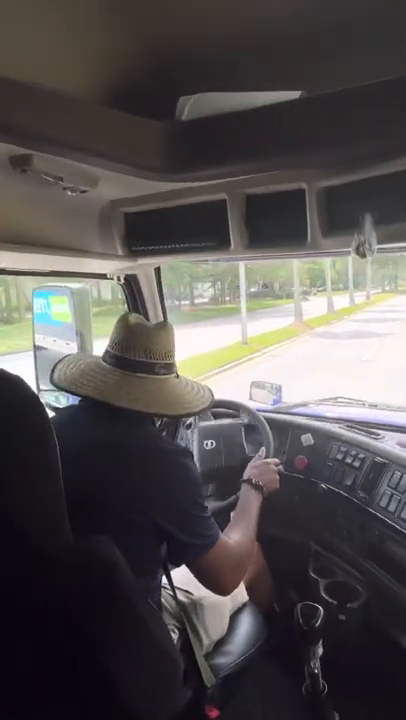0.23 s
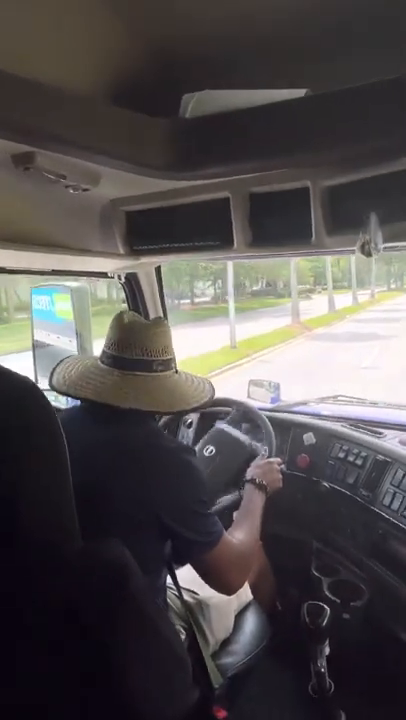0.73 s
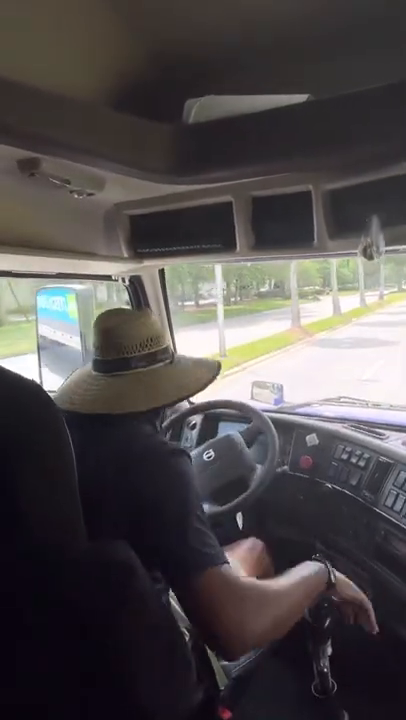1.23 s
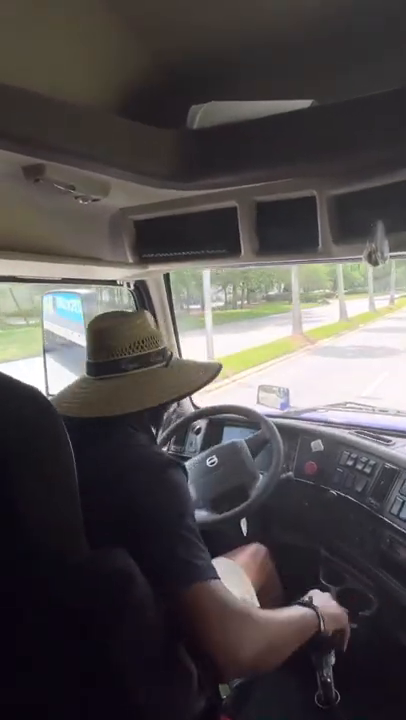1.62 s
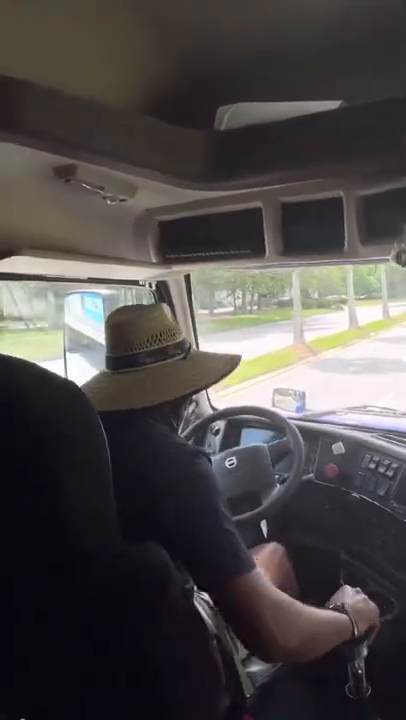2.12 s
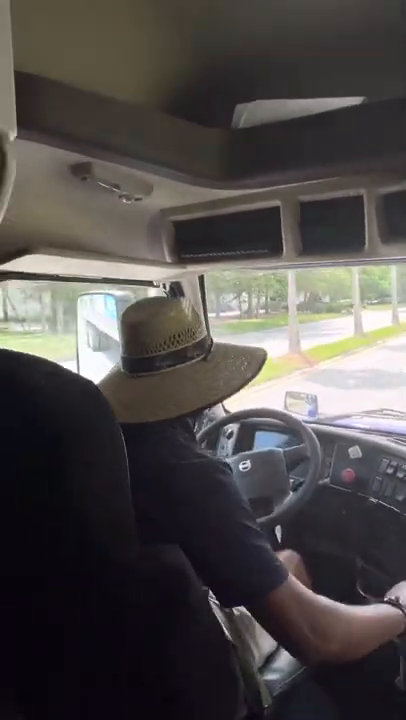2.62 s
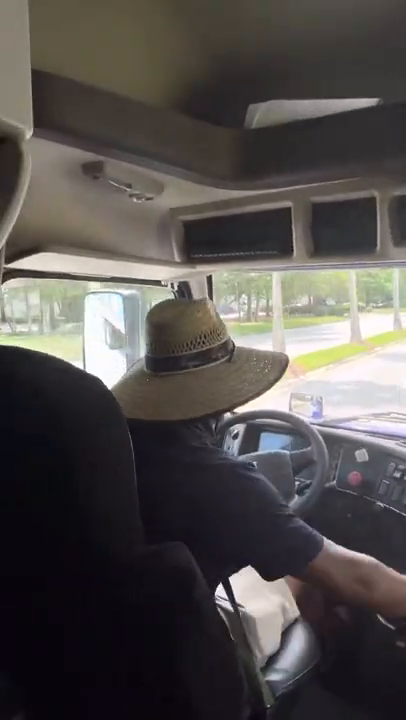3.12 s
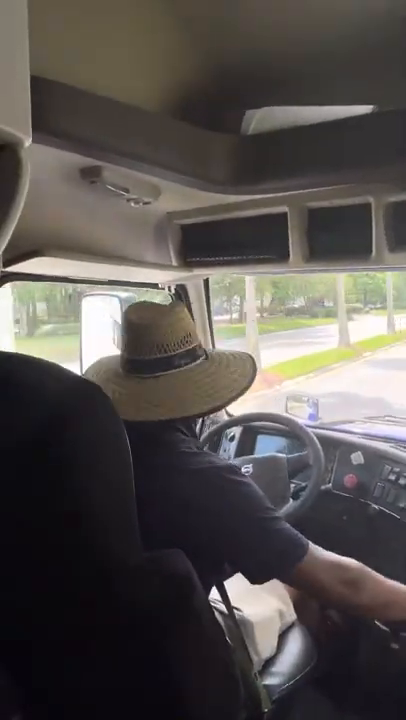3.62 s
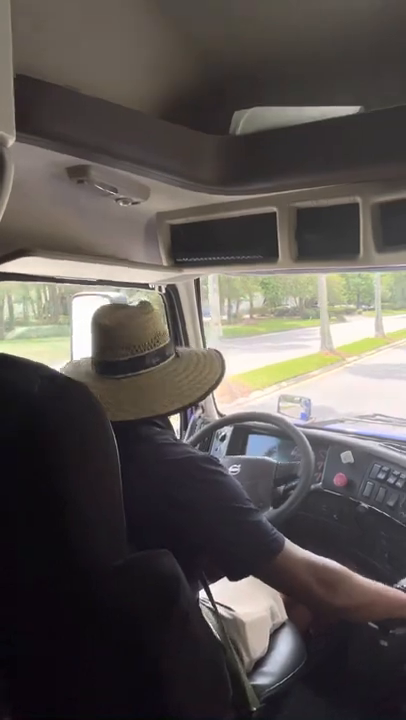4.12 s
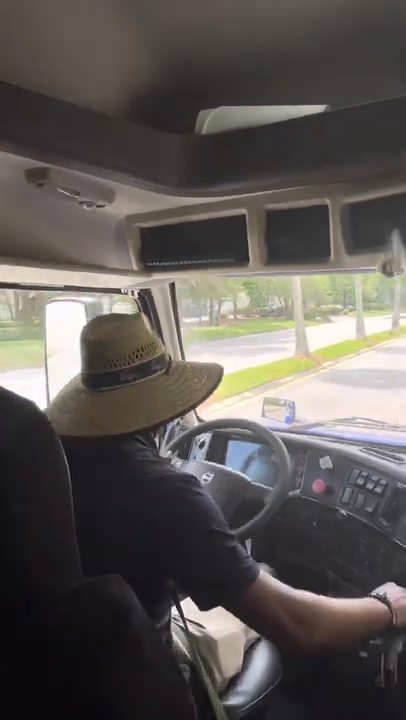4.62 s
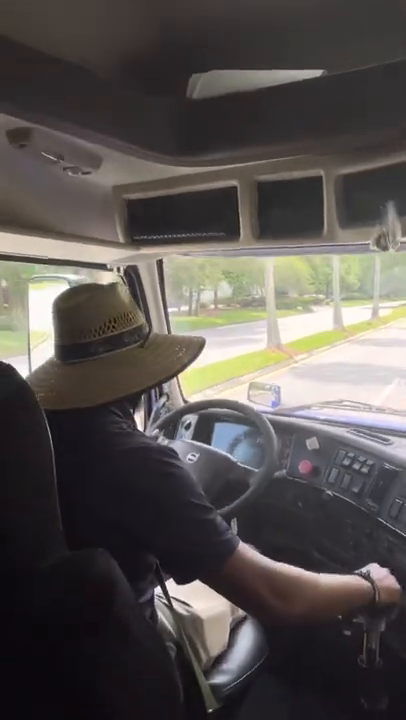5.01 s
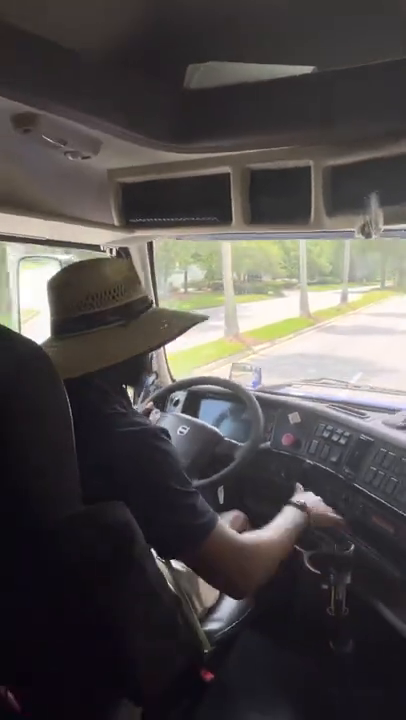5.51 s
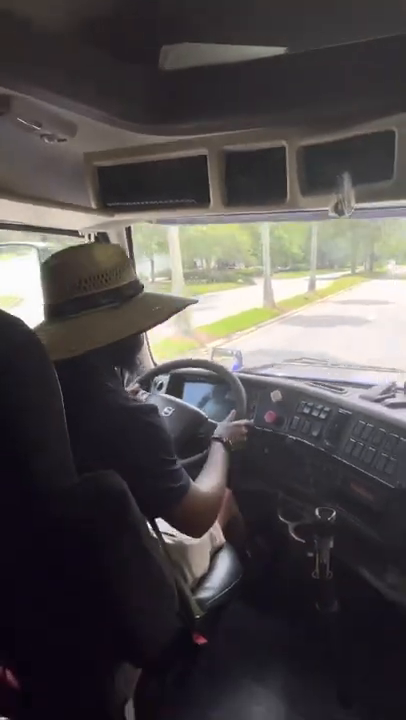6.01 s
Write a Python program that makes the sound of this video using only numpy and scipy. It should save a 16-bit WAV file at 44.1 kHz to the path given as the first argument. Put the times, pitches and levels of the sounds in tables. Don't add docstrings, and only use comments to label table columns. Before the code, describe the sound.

Inside a heavy diesel truck cab, the booming engine drops toward idle and picks up again while an indicator ticks and the gear lever knocks.

```python
import sys
import numpy as np
from scipy import signal
from scipy.fft import rfft, irfft, next_fast_len
from scipy.io import wavfile
from scipy.ndimage import uniform_filter1d, map_coordinates

SR = 44100
rng = np.random.default_rng(int(sys.argv[2]) if len(sys.argv) > 2 else 0)


def rack_gain(trim_db):
    fader = np.asarray(trim_db, float)
    return 10 ** (fader / 20)


def transcribe(signal):
    frames = np.atleast_2d(signal).T
    limited = np.clip(frames, -1, 1)
    pcm = np.round(limited * 32767).astype(np.int16)
    wavfile.write(sys.argv[1], SR, pcm)


N = 276507

# cycle_multiple, level_db
ENGINE_TONES = [(4, -19), (5, -19), (7, -6), (8, -18), (10, 9), (11, -6), (12, 4), (13, 5), (14, -24),
                (15, 1), (16, -33), (17, -15), (18, -2.5), (21, -6)]
# pitch_hz, width_hz, level_db
CAB_MODES = [(68.6, 23, -21.5), (138.4, 11.9, -9.5), (223, 160, -42)]
# cycle_multiple, level_db
JUDDER_TONES = [(6, 5), (8, -8), (10, -11), (12, -10)]
# pitch_hz, level_db
RUMBLE_COLOUR = [(20, -37), (35, -11.5), (55, -1), (95, -4.5), (140, -7), (220, -11), (400, -27),
                 (800, -120)]
# pitch_hz, level_db
ROAR_COLOUR = [(30, -120), (60, -16), (150, 1), (250, 0), (540, -0.5), (720, -1.5), (1000, -16),
               (1500, -21), (3000, -48), (6000, -120)]
# pitch_hz, level_db
FAN_COLOUR = [(800, 7.5), (2000, 0), (3500, -2), (4700, -2), (6500, -2), (8500, -5), (9800, 0.5),
              (11000, -3.5), (11500, -15.5), (12300, -32)]
# start_s, level_db
RELAY_STARTS = [
    (0.2962, -20),
    (0.581, -20.5),
]
# pitch_hz, level_db, fade_60db_s
TICK_MODES = [(1135, -5, 0.033), (1250, -2, 0.028), (1294, 4, .03), (1390, -14, 0.019), (1580, -4, 0.034),
              (1854, -4.5, 0.018), (1950, 3, 0.031), (2170, -16, .025), (2345, -1, 0.043),
              (2540, -1.5, 0.028), (2680, -5, 0.049), (3640, -8, 0.026), (4000, -11.5, 0.021),
              (4200, -5, 0.045)]
# pitch_hz, level_db, fade_60db_s
TOCK_MODES = [(2210, -9, 0.021), (2320, -1, 0.048), (2383, 1.5, 0.047), (2500, 4.5, 0.029),
              (2703, -3, 0.053), (2775, -2, 0.032), (2904, -4, 0.054), (3100, -5, 0.029), (3250, -24, .02),
              (3654, -11, 0.059), (3910, -22, 0.018), (4100, -12, 0.018), (4530, -9, 0.022),
              (4226, -6.5, 0.028)]
# start_s, peak_db, pitch_hz, fade_60db_s, snap_db
KNOCK_EVENTS = [(0.996, -27, 170, .045, -8), (1.214, -15.5, 230, .045, -8), (1.533, -18, 200, .035, -5),
                (1.55, -19, 170, .055, -12), (2.117, -20, 230, .045, -14), (2.14, -19, 170, .06, -12),
                (2.767, -43, 154, .045, -16), (2.8, -24, 145.6, .14, -19), (3.023, -28, 300, .03, -4),
                (3.029, -23, 240, .04, -5), (3.038, -21, 210, .04, -6), (3.051, -24, 200, .05, -5),
                (3.063, -27, 170, .05, -6), (3.092, -27, 190, .05, -5), (3.075, -27, 200, .06, -5),
                (3.852, -28, 250, .037, -12), (3.98, -19, 150, .04, -15), (4.172, -23, 170, .03, -10),
                (4.181, -21, 140, .04, -14), (4.187, -19, 200, .045, -5), (4.213, -22, 150, .06, -16),
                (4.474, -18, 150, .07, -7), (4.495, -18.5, 160, .055, -5), (5.502, -33, 214, .043, -19),
                (5.514, -37, 151, .042, -2), (6.171, -28, 260, .085, -12)]
# start_s, length_s, pitch_hz, level_db, overtones_db
SQUEAK_EVENTS = [
    (1.584, 0.067, 1440, -37, -32),
    (1.76, 0.047, 1020, -39.5, -30),
    (2.63, 0.019, 4596, -36, 3),
    (2.667, 0.021, 11000, -48, -60),
    (3.62, 0.012, 4530, -60, 9),
    (3.687, 0.017, 4600, -47, 10.5),
]
SQUEAK_THIRD_DB = [-8, -8, 0, 0, 3, -40]
# start_s, peak_db, fade_60db_s, middle_db, treble_db
SCUFF_EVENTS = [(2.631, -52, .06, 4, -6), (2.783, -34, 0.13, -18, -36), (2.795, -28.5, 0.063, -20, -36),
                (2.809, -44, 0.082, -20, -30), (2.985, -42, .05, -8, -1), (3.003, -34, 0.067, -13, -8),
                (3.022, -33.5, 0.062, -9, -2), (3.03, -32, 0.046, -16, -14), (3.046, -26, 0.06, -15, -7),
                (3.053, -29.5, 0.041, -11, -10), (3.08, -35, 0.049, -17, -12),
                (3.068, -37, 0.084, -5.5, 5.5), (3.089, -41, 0.053, -15, -5),
                (3.623, -42.5, .09, -2.5, -14), (3.635, -53, .08, 5, -17), (3.689, -40, .07, 0, -19),
                (3.704, -46, .08, -1, -14), (5.328, -35, 0.036, -11, -16), (5.34, -41.5, 0.09, 1, 6),
                (5.577, -54, .05, 2, 6), (5.765, -59, .097, -14, -18)]
# pitch_hz, right_lead_rad, likeness_0_to_1,
# left_minus_right_db
CHANNEL_DIFFERENCES = [(40, .6, .35, -.3), (130, 1.04, .9, -4.6), (260, 1.85, .72, -4.6), (410, 2.66, .8, -2),
                       (520, 2.9, .97, -.5), (650, 3.14, .999, -.1), (780, 3.42, .93, -.5),
                       (1100, 3.6, .65, -.7), (1750, 5, .2, -1.3), (2300, 3.5, .7, -1.5),
                       (4250, 4.9, .65, -1.5), (5300, .6, .72, -1.8), (8400, -2.3, .78, -.7),
                       (8800, -2.55, .86, -.3), (9150, -2.8, .93, 0), (9450, -3.1, .999, 0),
                       (9720, -3.18, .997, 0), (9950, -3.4, .92, 0), (10300, -3.8, .8, 0),
                       (11000, -4.65, .6, 0), (11500, -5.9, .8, 0), (11800, -6.28, .99, 0)]
# pitch_hz, width_hz, level_db
CLATTER_MODES = [(932, 85, -1.5), (1374, 290, -6), (1830, 1120, -10.5), (2510, 630, -6.5),
                 (2850, 1070, -16.5)]
# pitch_hz, level_db
CLATTER_TREBLE = [(3500, 0), (6000, -12), (10000, -90)]
# pitch_hz, level_db
MICROPHONE_TREBLE = [(11500, 0), (12200, -14), (13200, -29), (14300, -38)]
# time_s, cycles_hz
ENGINE_SPEED = [(0, 11.3), (.64, 12), (1.06, 12.7), (1.55, 13.5), (1.92, 14), (2.15, 12.4), (2.58, 9.65),
                (3.04, 6.7), (3.6, 6.2), (4.2, 6.3), (4.8, 8.4), (5.15, 8.9), (5.45, 9.2), (5.9, 10),
                (6.27, 10.3)]
# time_s, effort_db
ENGINE_EFFORT = [(0, 7), (.5, 3), (1.3, 0), (1.75, 3), (2.4, 2), (3, 5.5), (3.35, -2), (4.4, 0), (5, 1),
                 (5.45, 2), (6.27, -1.5)]
# middle_s, length_s, rumble_db, boom_db
BUMPS = [(0.0, 0.039, -2, 4.5), (0.728, 0.053, -2, 7.5), (1.023, 0.03, 9.5, -7), (1.18, 0.078, 6, 2.5),
         (1.548, 0.018, 11, -25), (1.756, 0.068, 1.5, 0), (2.128, 0.14, 2, -0.5), (2.886, 0.13, 5, 4.5),
         (3.08, 0.037, 6, 9), (4.191, 0.039, 10, 14), (4.496, 0.037, 8, 7), (5.133, 0.046, -11, 4),
         (5.39, 0.16, 8, -3), (5.893, 0.045, 9, -2)]

IDLE_HZ = 6.2
# (dB at idle, dB per octave of speed, share of the effort)
BOOM_LAW, RUMBLE_LAW, ROAR_LAW = (-43, 5.5, 1.1), (-37.5, 0.15, 0.4), (-44.5, 2.85, 0.71)
CLATTER_LAW, FAN_LAW, NINTH_LAW = (-48.5, 3.4, 0.038), (-55.5, 1.32, 0.043), (-52.5, 13.2, 0.3)
FIRING_DB, MOUNT_HZ = -46, 59.7
SWING_DB = 1
JUDDER_S, JUDDER_DB, GRAB_DB_PER_S, EASE_DB_PER_S = 5.43, -28, 110, 45
BEAT = .73
RELAY_PERIOD_S = .6
SWEEP, SWEEP_S = 1.8, .005
EDGE_DB, EDGE_FADE_S = 3, .035
WHINE_S, WHINE_END_S, WHINE_HZ, WHINE_DB = 1.33, 2.87, 531, -38
TURN = .09
GATE_HZ, GATE_DB = 8200, -9.5
STRICT_HZ, STRICT_DB_PER_KHZ = 11700, 6


def unit(x):
    return x / np.sqrt(np.mean(x ** 2) + 1e-20)


def band(order, low_hz, high_hz):
    return signal.butter(order, [low_hz, high_hz], "band", fs=SR, output="sos")


def along(f, v, hz):
    return np.interp(np.log(hz + 1), np.log(np.asarray(f) + 1), v)


def curves(rows):
    s, *cols = np.transpose(rows)
    return [np.interp(np.arange(N) / SR, s, c) for c in cols]


def wobble(rate):
    steps = np.arange(0, N + 128, 128)
    knots = rng.standard_normal(int(N * rate / SR) + 4)
    return np.interp(np.arange(N), steps, map_coordinates(knots, [steps * rate / SR]))


def filtered(x, response):
    m = next_fast_len(N + SR // 2)
    return irfft(rfft(x, m) * response(np.fft.rfftfreq(m, 1 / SR)), m)[..., :N]


def resonances(modes):
    def response(f):
        return sum((-1) ** k * rack_gain(db) * 1j * f * w / (c * c - f * f + 1j * f * w)
                   for k, (c, w, db) in enumerate(modes))
    return response


def shaped(colour):
    return lambda hz: rack_gain(along(*np.transpose(colour), hz))


def rush(colour, patchy_db):
    z = signal.stft(rng.standard_normal((2, N + 512)), nperseg=512)[2]
    field = uniform_filter1d(rng.standard_normal(z.shape[1:]), size=6, axis=0)
    field = uniform_filter1d(field, size=10, axis=1)
    pair = signal.istft(z * rack_gain(patchy_db * unit(field)), nperseg=512)[1][:, :N]
    return unit(filtered(pair, colour))


def add(track, s, sound):
    part = track[..., round(s * SR):][..., :sound.shape[-1]]
    part += sound[..., :part.shape[-1]]


def level(law):
    idle_db, per_octave_db, share = law
    octaves = np.log2(curves(ENGINE_SPEED)[0] / IDLE_HZ)
    return idle_db + per_octave_db * octaves + share * curves(ENGINE_EFFORT)[0]


def swell(column):
    t = np.arange(N) / SR
    return sum(row[column] * np.exp(-((t - row[0]) / row[1]) ** 2) for row in BUMPS)


def cab(x, t60, wet_db, apart_db):
    t = np.arange(SR // 6) / SR
    tail = rng.standard_normal((2, len(t))) * rack_gain(-60 * t / t60)
    wet = signal.fftconvolve(x[None], tail / np.linalg.norm(tail[0]), axes=1)[:, :len(x)]
    return np.array([x + rack_gain(wet_db) * wet[0], rack_gain(apart_db) * wet[1]])


def fan():
    return rack_gain(level(FAN_LAW) + 10.0 + 2.0 * wobble(2.57)) * rush(shaped(FAN_COLOUR), patchy_db=1.3)


def road_rumble():
    rumble_db = level(RUMBLE_LAW) + swell(column=2) + 2.3 * wobble(8)
    return rack_gain(rumble_db) * rush(shaped(RUMBLE_COLOUR), patchy_db=1.5)


def gear_whine():
    t = np.arange(N) / SR
    fade = np.clip((t - WHINE_S) / 0.11, 0, 1) * np.clip((WHINE_END_S - t) / 0.048, 0, 1)
    turns = np.cumsum(WHINE_HZ + 2.5 * wobble(6)) / SR
    return rack_gain(WHINE_DB + 2.5 * wobble(9)) * fade * np.sin(2 * np.pi * turns)


def scuffs():
    track, t = np.zeros(N), np.arange(SR // 5) / SR
    low, mid, high = band(3, 500, 2300), band(3, 3200, 6500), band(3, 8000, 14000)
    for s, db, t60, middle_db, treble_db in SCUFF_EVENTS:
        grit = rng.standard_normal((3, len(t)))
        grain = rack_gain(4.0 * unit(uniform_filter1d(grit[2], size=60)))
        puff = unit(signal.sosfilt(low, grit[0]))
        puff += rack_gain(middle_db) * unit(signal.sosfilt(mid, grit[1]))
        puff += rack_gain(treble_db) * unit(signal.sosfilt(high, grit[1]))
        add(track, s, rack_gain(db - 3.5 - 60 * t / t60) * (1 - np.exp(-t / 0.00064)) * grain * puff)
    return track


def squeaks():
    track, t = np.zeros(N), np.arange(SR // 6) / SR
    for (s, length, hz, db, second_db), third_db in zip(SQUEAK_EVENTS, SQUEAK_THIRD_DB):
        shake = unit(uniform_filter1d(rng.standard_normal((2, len(t))), size=60, axis=1))
        turns = np.cumsum(hz * (1 + .007 * shake[0])) / SR
        overtones_db = (0, second_db, second_db + third_db)
        tone = sum(rack_gain(g) * np.sin(2 * np.pi * k * turns)
                   for k, g in enumerate(overtones_db, 1) if k * hz < SR / 2)
        shape = (1 - np.exp(-t / .002)) / (1 + (t / length) ** 4)
        add(track, s, rack_gain(db + 2.5 * shake[1]) * shape * tone)
    return track


def knocks():
    track, front, t = np.zeros(N), np.zeros(N), np.arange(SR // 5) / SR
    dull = band(2, 210, 680)
    for s, db, hz, t60, snap_db in KNOCK_EVENTS:
        snap = unit(signal.sosfilt(dull, rng.standard_normal(len(t)))) * rack_gain(snap_db - 4 - 60 * t / 0.03)
        turns = hz * (t + SWEEP * SWEEP_S * (1 - np.exp(-t / SWEEP_S)))
        panel = rack_gain(-60 * t / t60) * np.sin(2 * np.pi * turns)
        add(track, s, rack_gain(db - 2) * (panel + snap) * (1 - np.exp(-t / 0.002)))
        edge = rack_gain(db + snap_db + EDGE_DB - 60 * t / EDGE_FADE_S) * np.sin(2 * np.pi * 1.4 * turns)
        add(front, s, edge * (1 - np.exp(-t / 0.0025)))
    return track, front


def relay():
    dry, heard, t = np.zeros(N), np.zeros((2, N)), np.arange(SR // 8) / SR
    for (first, db), modes in zip(RELAY_STARTS, (TICK_MODES, TOCK_MODES)):
        ring = sum(rack_gain(mode_db - 60 * t / t60) * np.sin(2 * np.pi * (hz * t + rng.random()))
                   for hz, mode_db, t60 in modes)
        crack = unit(signal.sosfilt(band(4, 1000, 4700), rng.standard_normal(len(t))))
        ring += rack_gain(-3.5 - 60 * t / 0.015) * crack
        for s in np.arange(first, N / SR, RELAY_PERIOD_S):
            click = rack_gain(db - 8 + .6 * rng.normal()) * ring * (1 - np.exp(-t / .0018))
            add(dry, s, click)
            add(heard, s, cab(click, t60=0.075, wet_db=-6, apart_db=3.5))
    return dry, heard


def engine_noise(cycle):
    gate = 1 + 0.025 * np.cos(12 * np.pi * cycle) + 0.027 * np.cos(2 * np.pi * cycle)
    roar_db = level(ROAR_LAW) + 8.0 + 0.067 * swell(column=2) + 0.14 * wobble(27)
    roar = rack_gain(roar_db) * rush(shaped(ROAR_COLOUR), patchy_db=2.0)
    block, dulling = resonances(CLATTER_MODES), shaped(CLATTER_TREBLE)
    clatter = rush(lambda hz: block(hz) * dulling(hz), patchy_db=2.0)
    clatter = rack_gain(level(CLATTER_LAW) + 5.0 + 1.4 * wobble(9.8)) * clatter
    return gate * (roar + clatter)


def orders(cycle, table, drift_db, drift, gain=lambda k: 1):
    def tone(k, db):
        size = gain(k) * rack_gain(db + drift_db * wobble(2.94))
        return size * np.sin(2 * np.pi * k * (cycle + BEAT + drift * wobble(2.936)))
    return sum(tone(k, db) for k, db in table)


def engine():
    speed, t = curves(ENGINE_SPEED)[0], np.arange(N) / SR
    cycle = np.cumsum(speed) / SR
    modes = resonances(CAB_MODES)
    boom = orders(cycle, ENGINE_TONES, drift_db=2, drift=.004, gain=lambda k: np.abs(modes(k * speed)))
    boom /= np.sqrt(np.abs(uniform_filter1d(boom ** 2, size=12000)) + 1e-9)
    boom += rack_gain(-4 - 9 * np.clip(speed / 2 - 5, 0, 1)) * rush(modes, patchy_db=0.5)[0]
    boom *= rack_gain(level(BOOM_LAW) + swell(column=3))
    swing = np.abs(uniform_filter1d(np.gradient(speed) * SR, size=SR // 3))
    firing = rack_gain(FIRING_DB - SWING_DB * swing) / (1 + (6 * speed / MOUNT_HZ) ** 8)
    firing = firing * orders(cycle, [(6, 8)], drift_db=2, drift=0.015)
    ninth = rack_gain(level(NINTH_LAW)) * orders(cycle, [(9, 2.2)], drift_db=1.5, drift=0.004)
    judder_db = JUDDER_DB - np.maximum(GRAB_DB_PER_S * (JUDDER_S - t), EASE_DB_PER_S * (t - JUDDER_S))
    judder = rack_gain(judder_db) * orders(cycle, JUDDER_TONES, drift_db=1.5, drift=0.033)
    return boom + firing + ninth + judder, cycle


def ports(pair):
    m = next_fast_len(N + 4096)
    hz = np.fft.rfftfreq(m, 1 / SR)
    f, *cols = np.transpose(CHANNEL_DIFFERENCES)
    lead, alike, tilt_db = (along(f, c, hz) for c in cols)
    angle = np.arccos(np.clip(alike, 0, 1)) / 2
    same, other = rfft(pair, m) * [np.cos(angle), np.sin(angle)]
    half = rack_gain(tilt_db / 2) * np.exp(-.5j * lead)
    both = irfft([(same + other) * half, (same - other) / half], m)[:, :N]
    return both + TURN * wobble(7) * np.gradient(both, axis=1) * [[1], [-1]]


def gated(pair):
    halves = np.array([pair[0] + pair[1], pair[0] - pair[1]]) / 2
    hz, _, z = signal.stft(halves, SR, nperseg=2048)
    power = np.add.reduceat(np.abs(z) ** 2, np.arange(0, len(hz), 12), axis=1)
    power = np.repeat(power, 12, axis=1)[:, :len(hz)]
    hiss = np.median(power[0, (hz > 10300) & (hz < 11000)])
    limit_db = GATE_DB + STRICT_DB_PER_KHZ * np.clip(hz - STRICT_HZ, 0, None) / 1000
    keep = (power > hiss * rack_gain(2 * limit_db)[:, None]) | (hz < GATE_HZ)[:, None]
    mid, side = signal.istft(z * keep, SR, nperseg=2048)[1][:, :N]
    return np.array([mid + side, mid - side])


def scene():
    tones, cycle = engine()
    tick, ticks = relay()
    rub = squeaks() + scuffs()
    rubs = cab(rub, t60=0.058, wet_db=-3.5, apart_db=4.5)
    knock, front = knocks()
    blows = cab(knock, t60=0.03, wet_db=-14, apart_db=-2)
    hum = tones * np.array([[1], [.3]]) + gear_whine() * np.array([[1], [0]])
    noises = road_rumble() + engine_noise(cycle) + fan()
    alike = filtered(rack_gain(-2.0) * tick + rack_gain(-2) * rub, lambda hz: 1 / (1 + (hz / 1900) ** 4))
    held = blows[0] * rack_gain([[-4], [-3]]) + front
    return ports(ticks + rubs + hum + noises + 1.5 * blows) + held + alike


def top_cut(x):
    return signal.sosfilt(signal.butter(12, 14330, fs=SR, output="sos"), x)


def record(dry):
    return top_cut(filtered(gated(dry), shaped(MICROPHONE_TREBLE)))


dry = scene()
out = record(dry)
transcribe(out)
```